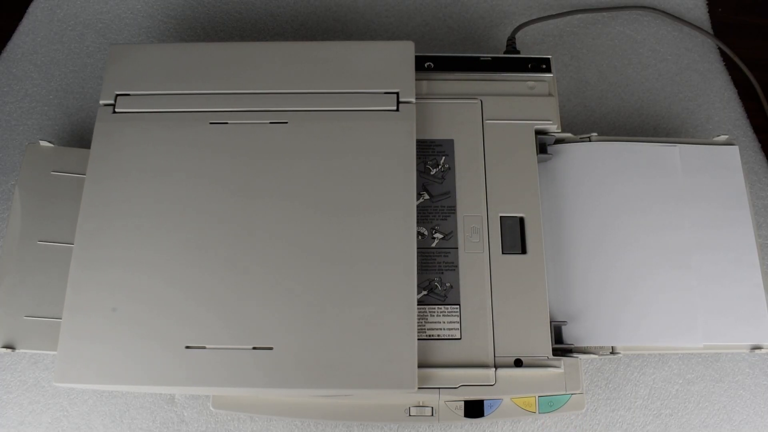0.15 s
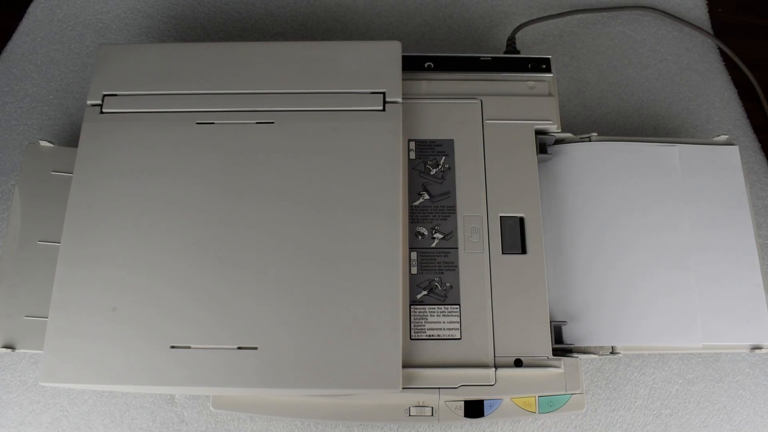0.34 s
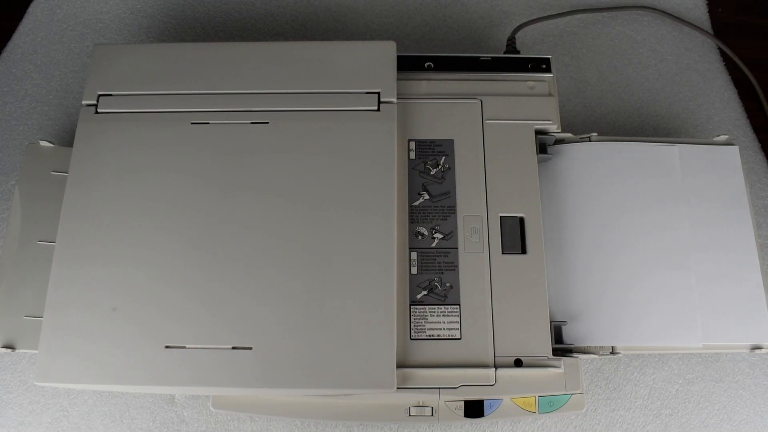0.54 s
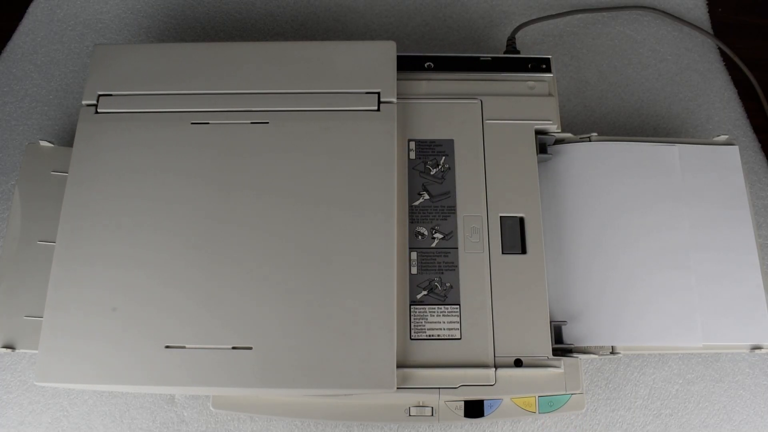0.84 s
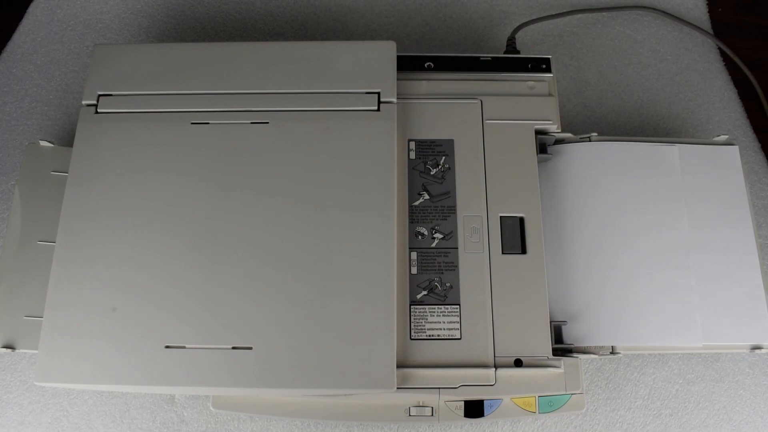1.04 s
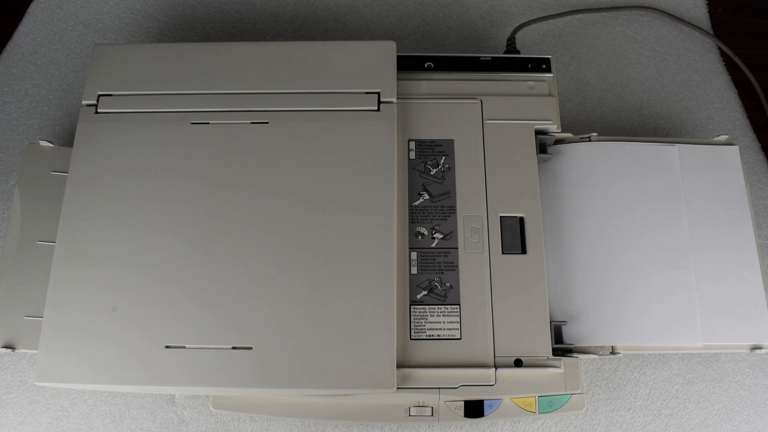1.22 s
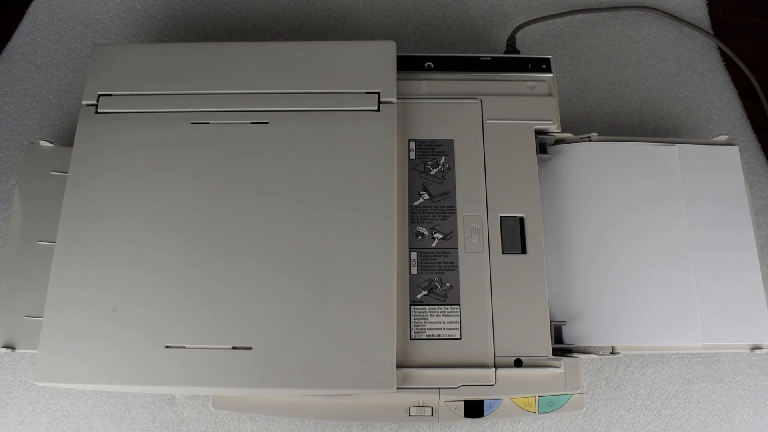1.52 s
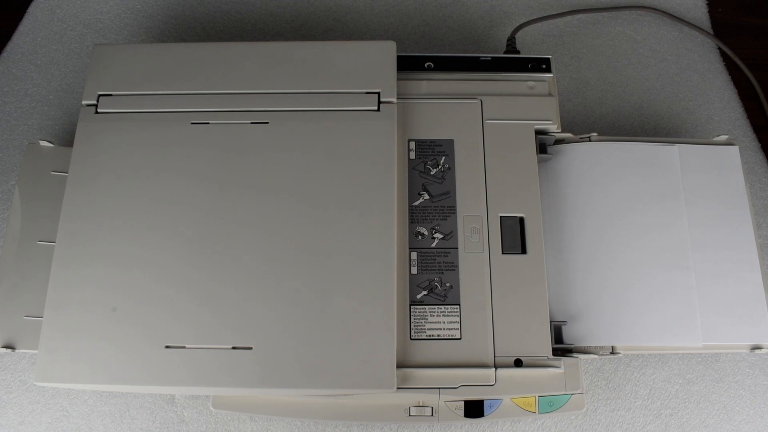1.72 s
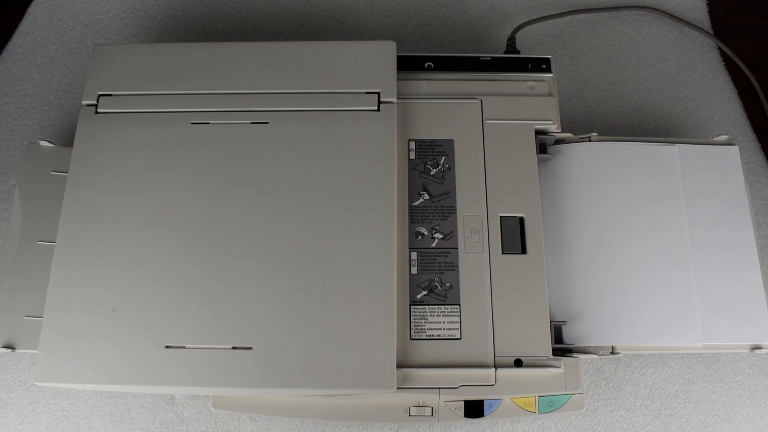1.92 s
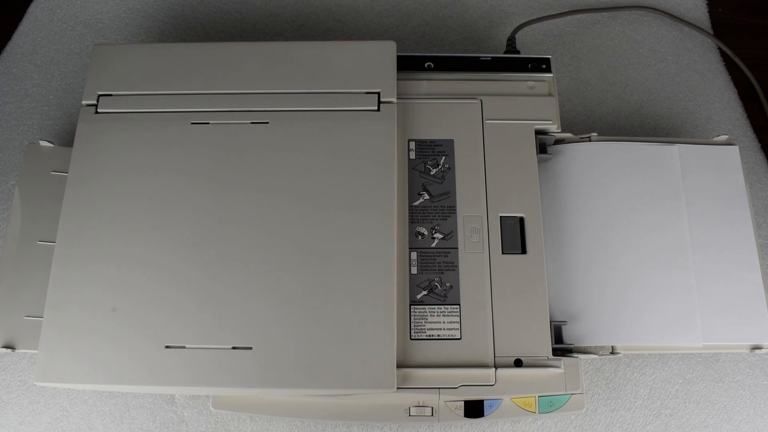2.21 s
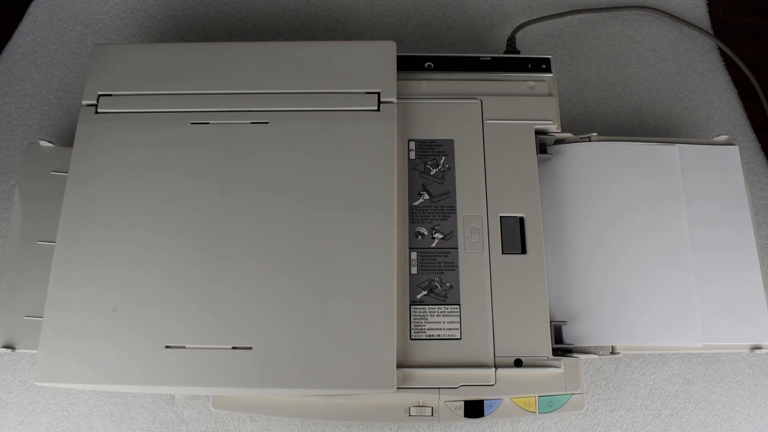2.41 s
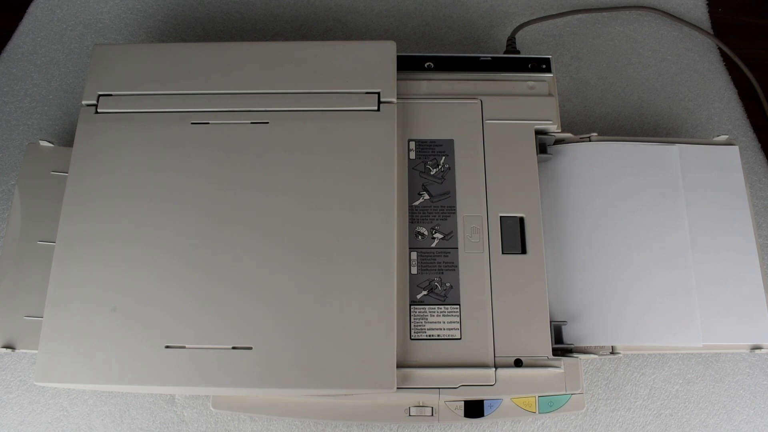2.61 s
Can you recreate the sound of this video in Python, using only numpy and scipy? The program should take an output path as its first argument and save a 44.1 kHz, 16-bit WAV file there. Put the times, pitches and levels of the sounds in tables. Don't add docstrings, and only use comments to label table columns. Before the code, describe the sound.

A small copier's motor and fan whirr steadily throughout; in the first 0.7 seconds its sliding lid rattles, scrapes, clicks and thumps to a stop. Close microphone, quiet room with a short, dull reverberation.

```python
import sys
import numpy as np
from scipy import signal
from scipy.fft import rfft, irfft
from scipy.io import wavfile
from scipy.ndimage import uniform_filter1d

SR = 44100
rng = np.random.default_rng(int(sys.argv[2]) if len(sys.argv) > 2 else 0)


def store_pcm(level_fs):
    pcm = np.round(np.clip(level_fs, -1, 1) * 32767).astype(np.int16)
    wavfile.write(sys.argv[1], SR, np.atleast_2d(pcm).T)


def gain_from_db(level_db):
    decades = np.asarray(level_db, float) / 20
    return 10 ** decades


N = 121275

# frequency in Hz, level in dB per Hz.
AIR_SPECTRUM = [(25, -42), (60, -14), (130, -11.5), (460, -17.5), (800, -13.5), (5600, -35), (15200, -50.5),
                (16000, -75)]
# centre in Hz, width in Hz, gain in dB.
DUCT_RESONANCES = [(83.6, 27.4, 9.5), (117.4, 16.8, 12), (145, 33, 9.5), (189.7, 14, -9), (225.4, 19.3, 9),
                   (277, 20, -12.5), (348, 13, 2), (700, 580, 4.5), (1070, 97, 7), (2132, 145, 8.5),
                   (2655, 310, 13.5), (3760, 360, 10), (5640, 380, 12), (9260, 300, 9)]
SHAFT_ORDERS = [15, 17, 24, 29, 30, 31, 35, 60, 74, 75, 76, 151, 153, 155, 156, 158, 254, 286]
SHAFT_ORDER_DB = [-42.5, -60.5, -59, -51.5, -50, -60, -58.5, -59, -75, -56, -72, -69, -65.5, -60.5, -70,
                  -83, -71, -82]
# frequency in Hz, rms dB per order.
CLATTER_SPECTRUM = [(400, -68), (2000, -78), (3700, -78), (5000, -78.5), (5700, -76.5), (6500, -93.5),
                    (8000, -87), (15000, -116)]
DRIVE_TONES_HZ = [413.5, 558.85, 14676.2, 14856.8, 15037.3, 15720]
DRIVE_TONES_DB = [-59, -52, -83, -85, -91, -101]
GEAR_HARMONICS_DB = [-40.2, -57]
# frequency in Hz, level in dB, t60 in seconds.
CASE_MODES = [(338, 0.5, 0.12), (454.4, -14, 0.16), (600, 6, 0.071), (680, 7.5, .11), (795, -6, 0.33),
              (1117, -1.5, 0.03), (1260, 3, 0.04), (1515, -4.5, 0.051), (1744, -5.5, 0.045),
              (2265, 1.5, 0.036), (2610, -17, 0.14), (3000, -15, 0.092), (3450, -2, 0.034),
              (3620, -15, 0.11)]
# frequency in Hz, level in dB, t60 in seconds.
LATCH_MODES = [(4095, -7, 0.042), (4550, -5, 0.043), (5150, -9, 0.026), (5609, 3, .033), (6293, -21, 0.046),
               (7700, -5, 0.033), (8600, -17, 0.052), (9120, -17, 0.047), (10700, -3, 0.016),
               (13250, -15, .03), (14810, -16, .02)]
# start in seconds, level in dB, low edge in Hz, high edge in Hz,
# rattle decay in seconds.
PLATEN_KNOCKS = [(.0640, -32, 800, 2720, 0.0069), (0.0796, -24, 960, 2470, 0.00065),
                 (0.1198, -25, 600, 2050, 0.00084), (0.1939, -18.5, 980, 3000, .0015),
                 (.1940, -31, 3000, 5600, 0.0042), (0.213, -32.5, 700, 2600, 0.0016),
                 (.2350, -28.5, 493, 3520, 0.0047), (.2440, -30.5, 480, 760, 0.0047),
                 (0.275, -27, 700, 4370, 0.0033), (0.28, -18, 505, 3300, 0.0032),
                 (.3170, -31, 500, 2500, 0.0014), (.3578, -14.5, 3740, 6800, .0035),
                 (.3580, -24, 7000, 13100, 0.0027), (.3585, -23.5, 1110, 3550, 0.0016),
                 (.4415, -31, 4000, 12000, 0.0013), (.4455, -26, 417, 3480, 0.005),
                 (0.5794, -29, 785, 1760, 0.001), (.6602, -24.5, 1000, 2600, 0.0051),
                 (0.6633, -26, 1200, 4060, .001), (.6657, -13, 890, 3720, 0.00075),
                 (.6674, -12.5, 526, 1200, 0.0016), (.6650, -28, 4000, 9800, .0015),
                 (.6690, -26.5, 310, 700, 0.0011), (.6990, -28, 415, 1810, 0.00086)]
# start in seconds, length in seconds, level in dB, low edge in Hz, high edge in Hz.
PLATEN_SCRAPES = [
    (.2665, .022, -31, 800, 9500),
    (.431, .027, -34, 1200, 9500),
    (.459, .018, -50, 8000, 10500),
    (.058, .018, -36, 800, 2100),
    (.168, .006, -56, 7500, 12000),
]
# frequency in Hz, left minus right in dB.
PORT_TILT = [(60, -.1), (250, -.5), (600, -.2), (1300, -.8), (2500, -.5), (5000, -.3), (9000, .4),
             (14000, -.4)]
# frequency in Hz, side level in dB.
SIDE_SPECTRUM = [(30, -30), (90, -35), (180, -27), (350, -20), (700, -28), (2500, -21), (8000, -14),
                 (15000, -10)]


def unit(x):
    return x / np.sqrt(np.mean(x ** 2))


def slope(table, hz):
    table = np.array(table, float)
    return np.interp(np.log(hz + 1), np.log(table[:, 0]), table[:, 1])


def colour(x, db):
    hz = np.arange(len(x) // 2 + 1) * SR / len(x)
    return irfft(rfft(x) * gain_from_db(db(hz)), len(x))


def bell(low_hz, high_hz):
    return lambda hz: -10 * np.log10((1 + (low_hz / (hz + 1)) ** 6) * (1 + (hz / high_hz) ** 9))


def walk(rate_hz):
    hold = int(SR / rate_hz)
    levels = np.repeat(rng.standard_normal(N // hold + 1), hold)
    return 0.98 * uniform_filter1d(uniform_filter1d(levels, hold), hold)[:N]


def tail(x, t60):
    t = np.arange(SR // 3) / SR
    echoes = rng.standard_normal(len(t)) * np.exp(-np.log(1000) * t / t60)
    return signal.fftconvolve(x, echoes / np.sqrt(np.sum(echoes ** 2)))[:N]


def room(hits):
    level_db, t60_s, dull_hz = -15, 0.23, 6000
    return colour(tail(hits, t60_s), lambda hz: level_db - 10 * np.log10(1 + (hz / dull_hz) ** 2))


def fan():
    level_db, flicker_db = -39, 0.68

    def duct_gain(hz):
        bumps = sum(db / (1 + (2 * (hz - centre) / width) ** 2) for centre, width, db in DUCT_RESONANCES)
        return slope(AIR_SPECTRUM, hz) + bumps

    noise = colour(rng.standard_normal(N), duct_gain)
    air = 0
    for centre in 40 * 2. ** np.arange(10):
        octave = lambda hz: 20 * np.log10(np.clip(1 - abs(np.log2((hz + 1) / centre)), 1e-6, 1))
        air = air + colour(noise, octave) * gain_from_db(flicker_db * walk(9.2))
    return unit(air) * gain_from_db(level_db)


def squeak(t):
    turn_s, first_s, chirp_s = .1012, .039, .013
    centre_hz, width_hz, level_db = 8180, 330, -66.5
    turn = (t - first_s) / turn_s
    nearest = np.round(turn)
    strength = gain_from_db(1.5 * rng.standard_normal(40))[nearest.astype(int)]
    gate = np.exp(-.5 * ((turn - nearest) * turn_s / chirp_s) ** 2)
    gate = gate * strength * gain_from_db(2 * walk(150))
    resonance = lambda hz: -20 * np.log10(1 + (2 * (hz - centre_hz) / width_hz) ** 2)
    hiss = colour(rng.standard_normal(N), resonance)
    return unit(hiss) * gate * gain_from_db(level_db)


def flutter(rate_hz):
    return gain_from_db(1 * walk(rate_hz))


def sine(cycles, db):
    return np.sqrt(2) * gain_from_db(db) * flutter(12) * np.sin(2 * np.pi * (cycles + rng.random()))


def clatter(turns, shaft_hz):
    scatter_db = 4.5
    orders = np.arange(8, 430)
    scatter = scatter_db * np.sqrt(3) * rng.uniform(-0.85, 1, len(orders))
    levels = gain_from_db(slope(CLATTER_SPECTRUM, orders * shaft_hz) + scatter)
    lines = np.zeros(8193, complex)
    lines[orders] = levels * np.exp(2j * np.pi * rng.random(len(orders)))
    lines[SHAFT_ORDERS] = 0
    one_turn = irfft(lines) * len(lines) * np.sqrt(2)
    return np.interp(turns % 1 * len(one_turn), np.arange(len(one_turn)), one_turn) * flutter(14)


def motor(t):
    shaft_hz, gear_hz, speed_wander = 36.124, 817.63, .00003
    turns = np.cumsum(shaft_hz * (1 + speed_wander * walk(1.7))) / SR
    out = clatter(turns, shaft_hz)
    out = out + sum(sine(k * turns, db) for k, db in zip(SHAFT_ORDERS, SHAFT_ORDER_DB))
    out = out + sum(sine((k + 1) * gear_hz * t, db) for k, db in enumerate(GEAR_HARMONICS_DB))
    return out + sum(sine(hz * t, db) for hz, db in zip(DRIVE_TONES_HZ, DRIVE_TONES_DB))


def slide(t):
    level_db, end_s, fade_s = -49, 0.59, 0.069
    rub = unit(colour(rng.standard_normal(N), bell(250, 2500))) * gain_from_db(5.6 * walk(40.7))
    return rub * gain_from_db(level_db) * np.clip((end_s - t) / fade_s, 0, 1)


def case_ring(t):
    ring_db, scatter_db = -15, 3
    body_db, body_t60_s, treble_t60_s, split_hz = 3.5, 0.088, 0.013, 2450
    fade = lambda t60: np.exp(-np.log(1000) * t / t60)
    modes = CASE_MODES + LATCH_MODES
    gains = gain_from_db(ring_db + scatter_db * rng.standard_normal(len(modes)))
    gains = gains * rng.choice([-1, 1], len(modes))
    ring = 0
    for gain, (hz, db, t60) in zip(gains, modes):
        level = gain * gain_from_db(db) * np.sqrt(hz / t60) / 2500
        ring = ring + level * np.sin(2 * np.pi * hz * t) * fade(t60)
    noise = rng.standard_normal(len(t))
    low = colour(noise, lambda hz: -10 * np.log10(1 + (hz / split_hz) ** 4))
    ring = ring + gain_from_db(body_db) * (low * fade(body_t60_s) + (noise - low) * fade(treble_t60_s)) / 20
    ring[0] = 1
    return ring


def strike(push, db, low_hz, high_hz):
    size = len(push)
    both = signal.fftconvolve(push, case_ring(np.arange(size) / SR))[:size]
    lumps = uniform_filter1d(abs(rfft(both)) ** 2, size=96, mode="mirror")
    both = irfft(rfft(both) / np.sqrt(lumps), size)
    out = colour(np.roll(both, 400), bell(low_hz, high_hz))
    peak = np.sqrt(np.max(uniform_filter1d(out ** 2, size=132)))
    return out / peak * gain_from_db(db)


def platen():
    size = 8192
    clicks_per_s, lift_s = 3400, 0.0033
    out = np.zeros(N + 2 * size)
    t = np.arange(size) / SR

    def place(start_s, hit):
        at = int(start_s * SR) + size - 400
        out[at:at + size] += hit

    for start_s, db, low_hz, high_hz, decay_s in PLATEN_KNOCKS:
        push = rng.standard_normal(size) * rng.random(size) ** 3 * np.exp(-t / decay_s)
        push[0] = 2.35
        place(start_s, strike(push, db, low_hz, high_hz))
    for start_s, length_s, db, low_hz, high_hz in PLATEN_SCRAPES:
        clicks = (rng.random(size) < clicks_per_s / SR) + 0.12
        push = rng.standard_normal(size) * clicks * np.clip((length_s - t) / lift_s, 0, 1)
        place(start_s, strike(push, db, low_hz, high_hz))
    return out[size:size + N]


def scene():
    t = np.arange(N) / SR
    hits = platen()
    mid = fan() + squeak(t) + motor(t) + slide(t) + hits + room(hits)
    impulse = np.arange(N) == 0
    desk = rfft(tail(impulse, .012)).real
    reflected = irfft(1j * unit(desk) * rfft(mid), N)
    side = colour(reflected, lambda hz: slope(SIDE_SPECTRUM, hz))
    left = colour(mid, lambda hz: slope(PORT_TILT, hz) / 2) + side
    right = colour(mid, lambda hz: -slope(PORT_TILT, hz) / 2) - side
    return np.array([left, right])


def roll_off(x):
    return signal.sosfilt(signal.butter(12, 16830, fs=SR, output="sos"), x)


def record(dry):
    top = np.array([colour(ch, lambda hz: -90 * (hz < 15760)) for ch in dry])
    loud = uniform_filter1d(top ** 2, size=1024) > gain_from_db(-73) ** 2
    mix = dry - top * ~loud
    return roll_off(mix)


dry = scene()
out = record(dry)
store_pcm(out)
```